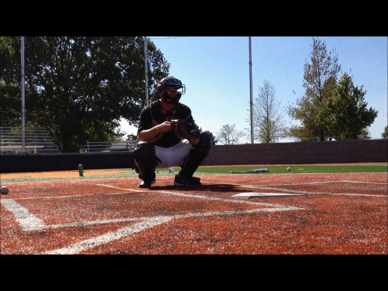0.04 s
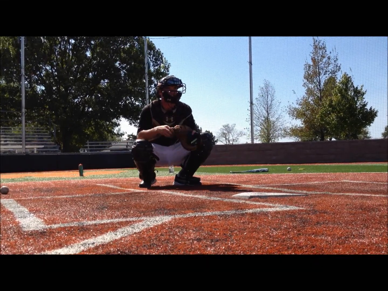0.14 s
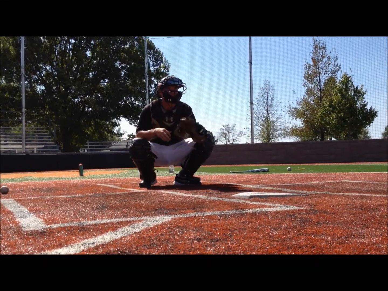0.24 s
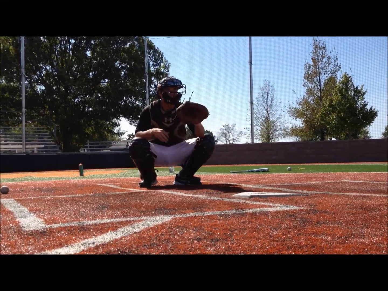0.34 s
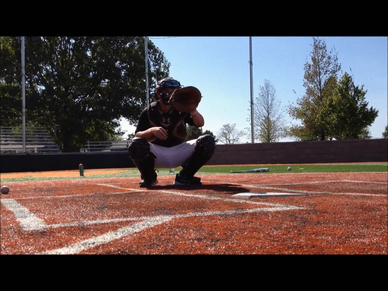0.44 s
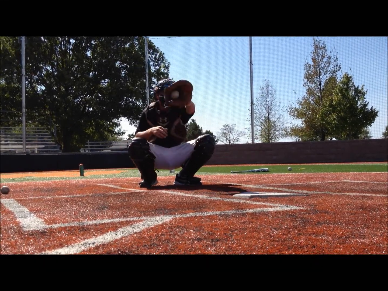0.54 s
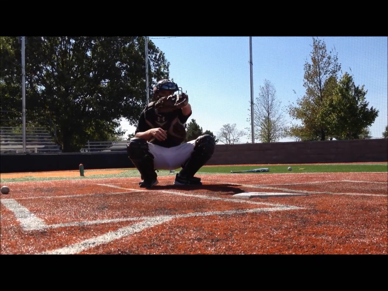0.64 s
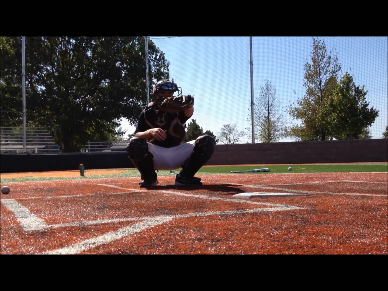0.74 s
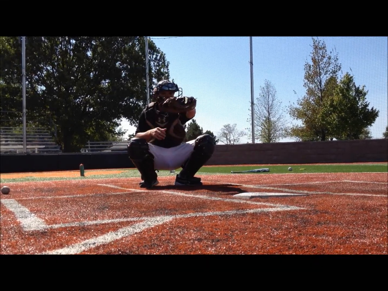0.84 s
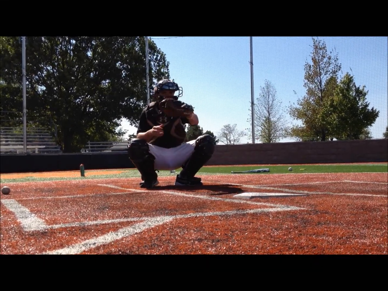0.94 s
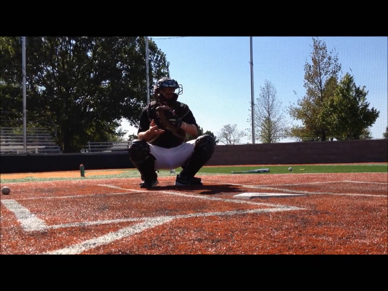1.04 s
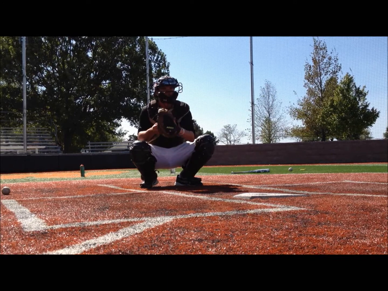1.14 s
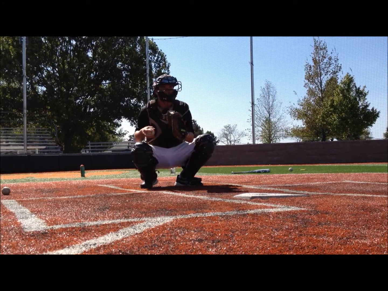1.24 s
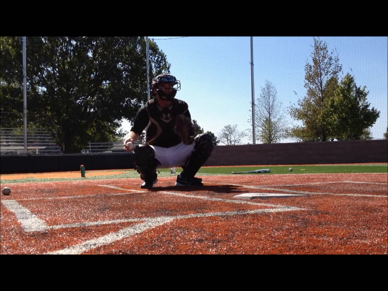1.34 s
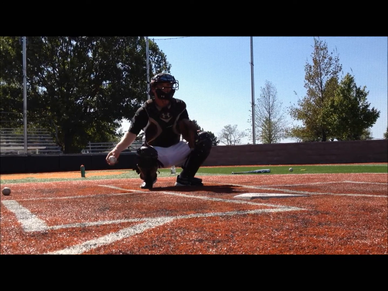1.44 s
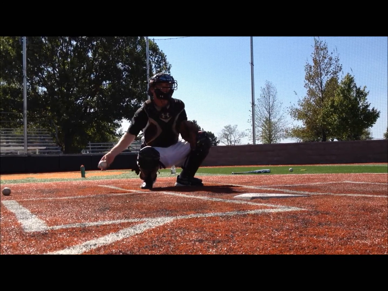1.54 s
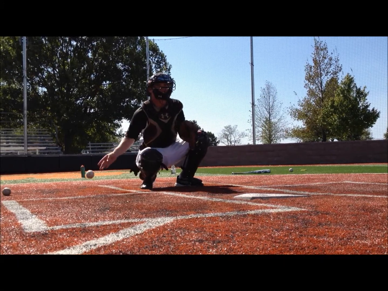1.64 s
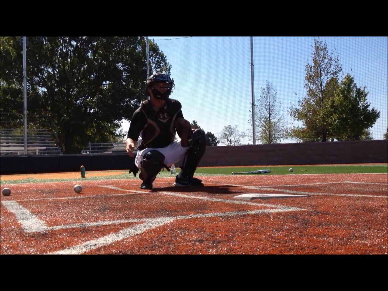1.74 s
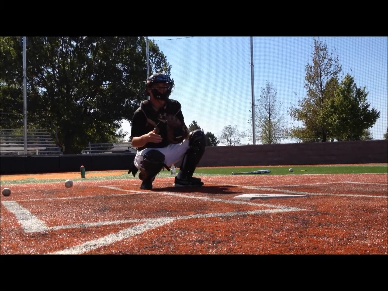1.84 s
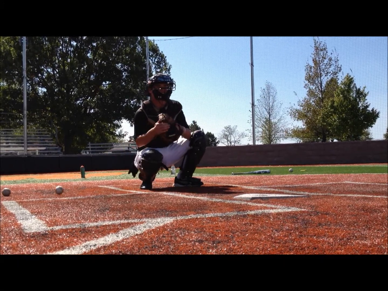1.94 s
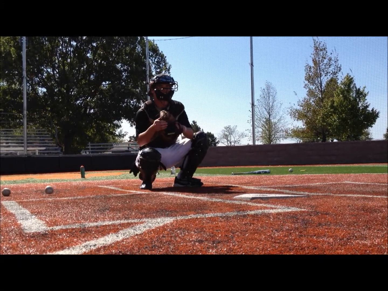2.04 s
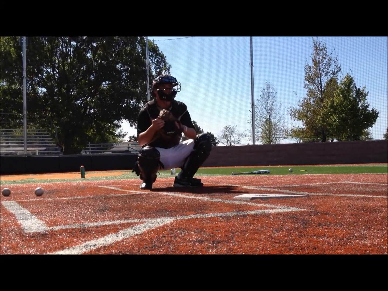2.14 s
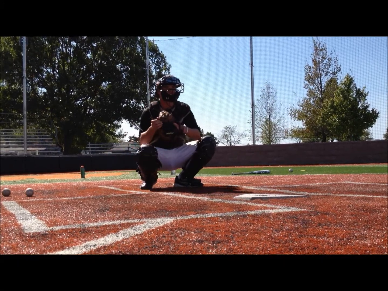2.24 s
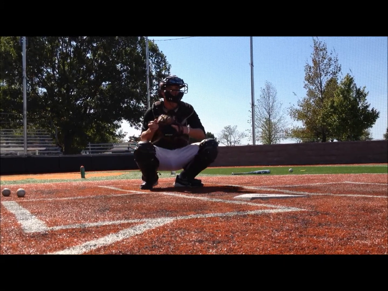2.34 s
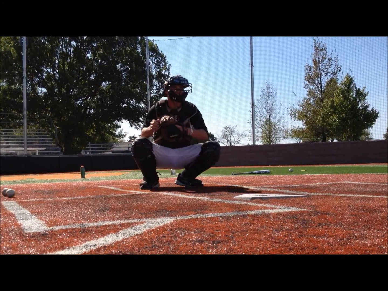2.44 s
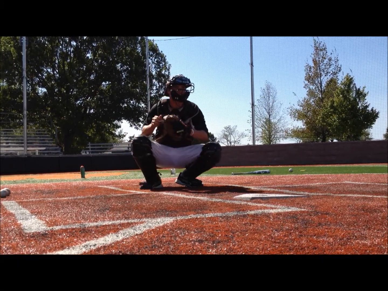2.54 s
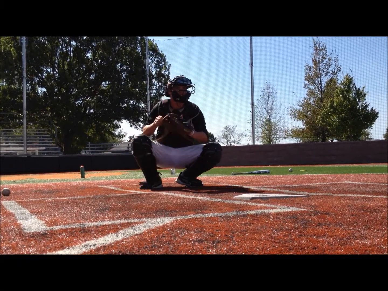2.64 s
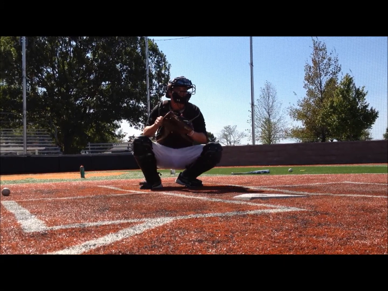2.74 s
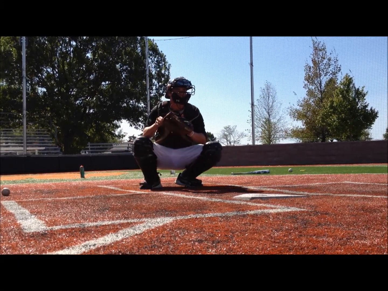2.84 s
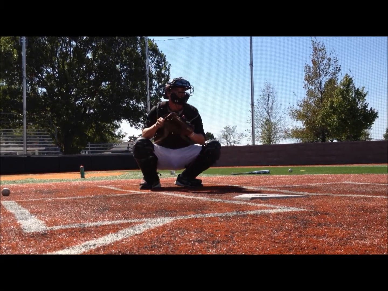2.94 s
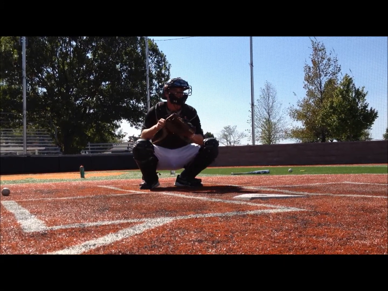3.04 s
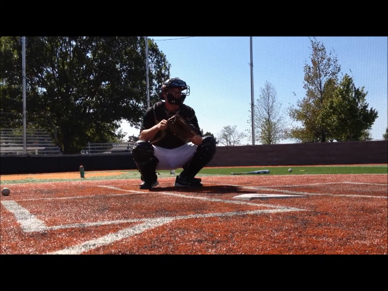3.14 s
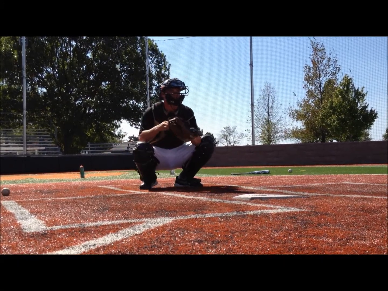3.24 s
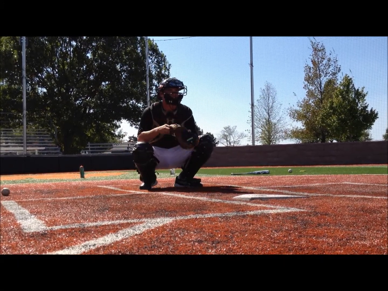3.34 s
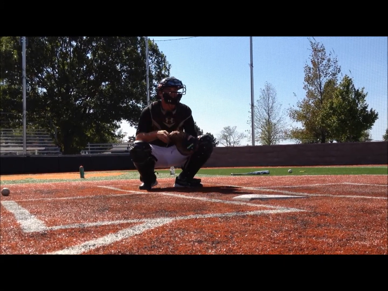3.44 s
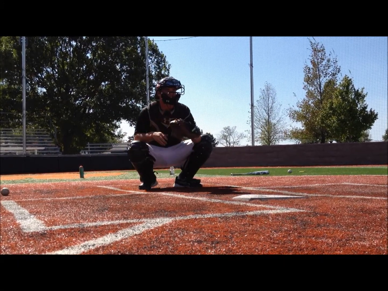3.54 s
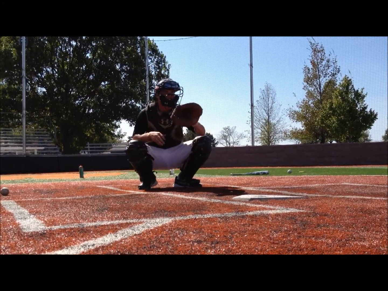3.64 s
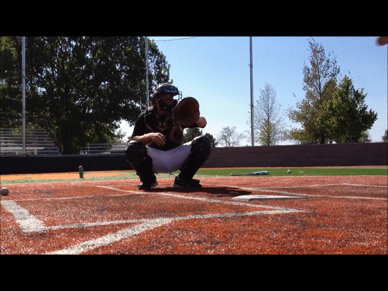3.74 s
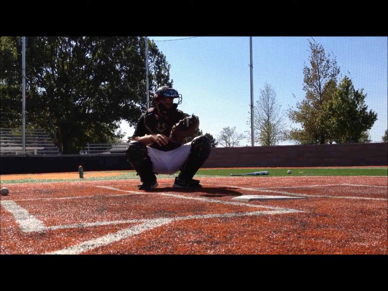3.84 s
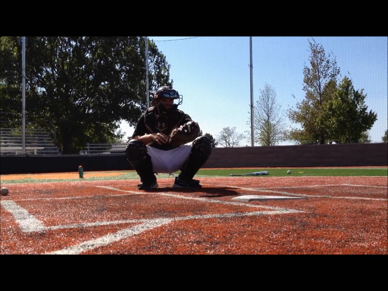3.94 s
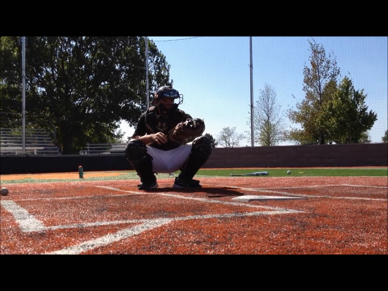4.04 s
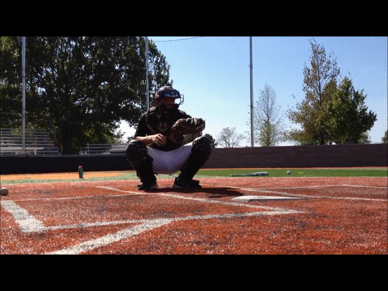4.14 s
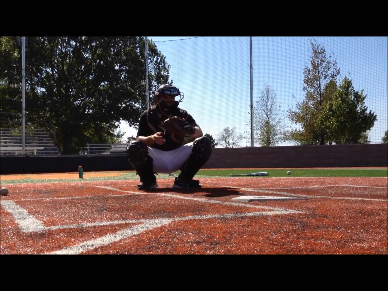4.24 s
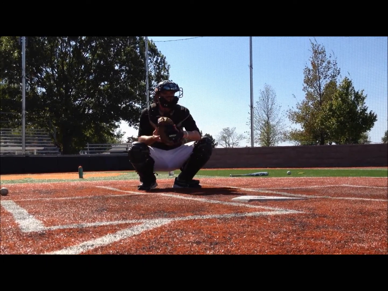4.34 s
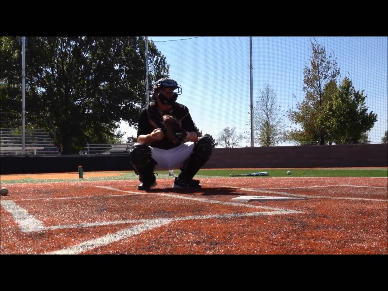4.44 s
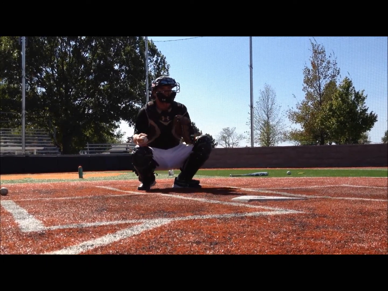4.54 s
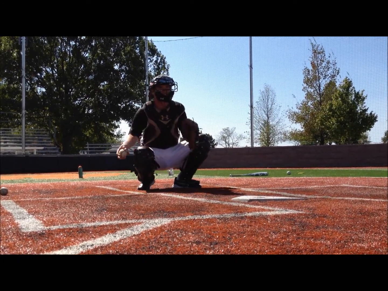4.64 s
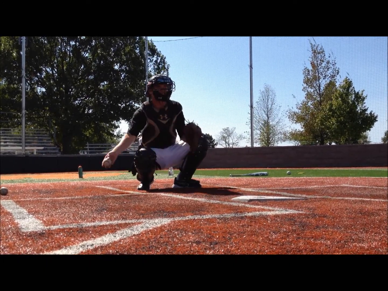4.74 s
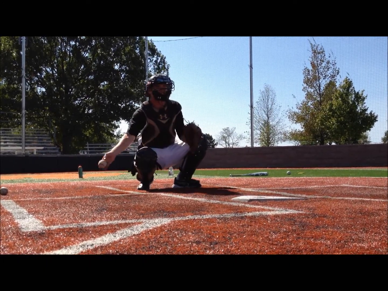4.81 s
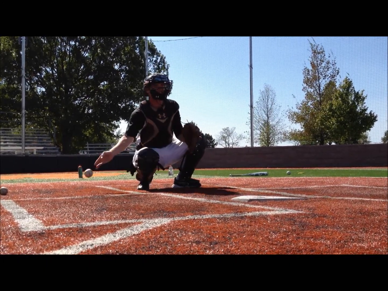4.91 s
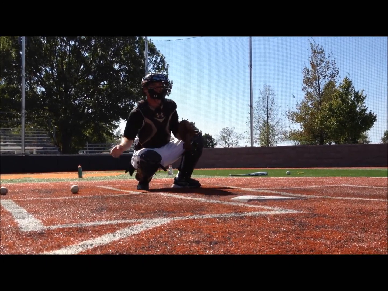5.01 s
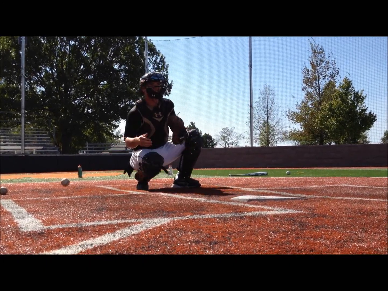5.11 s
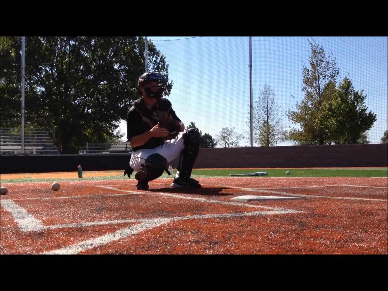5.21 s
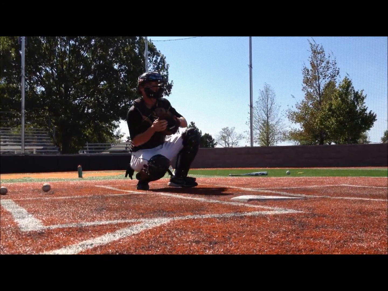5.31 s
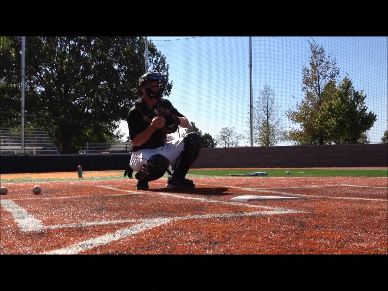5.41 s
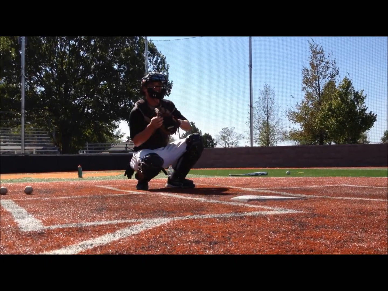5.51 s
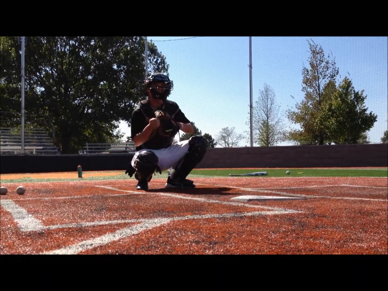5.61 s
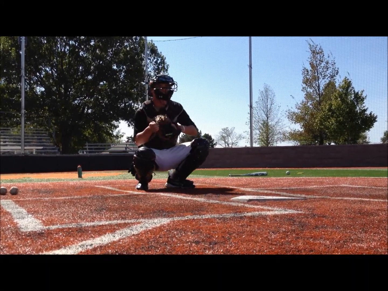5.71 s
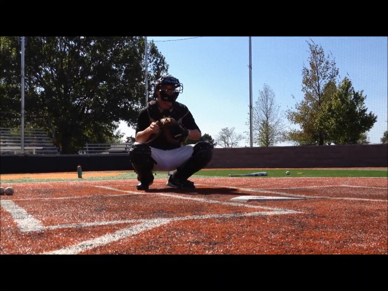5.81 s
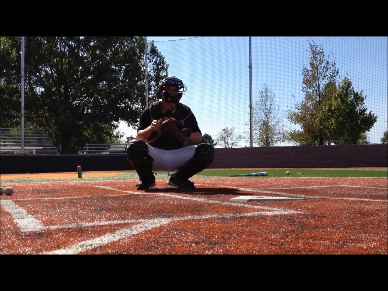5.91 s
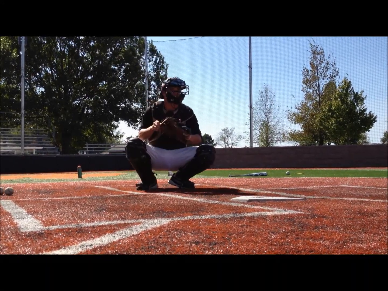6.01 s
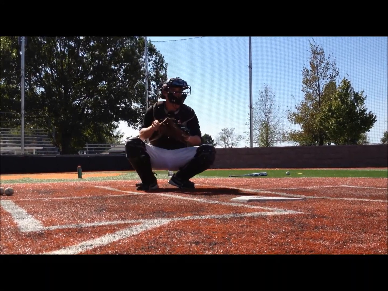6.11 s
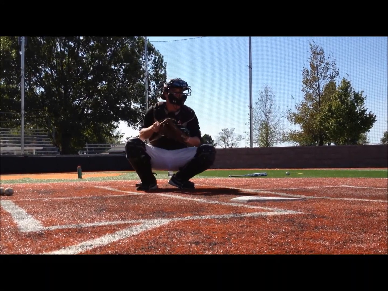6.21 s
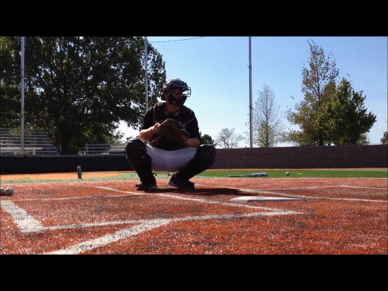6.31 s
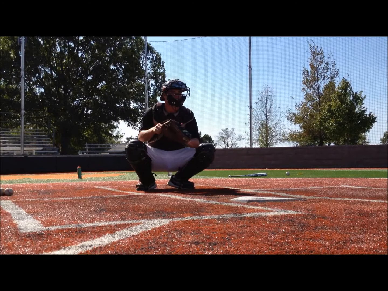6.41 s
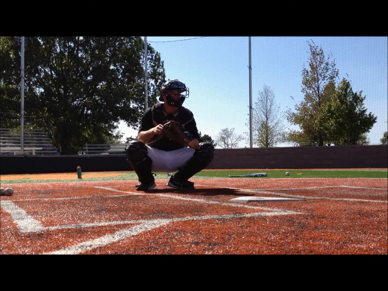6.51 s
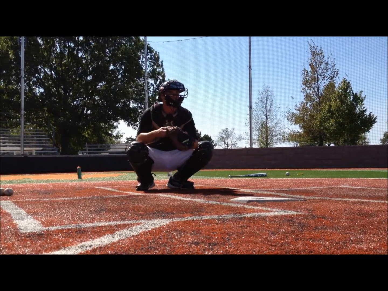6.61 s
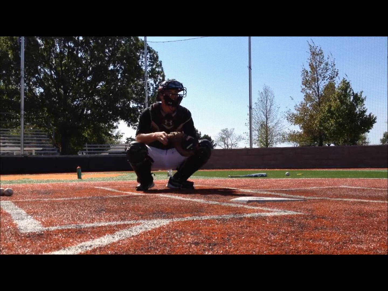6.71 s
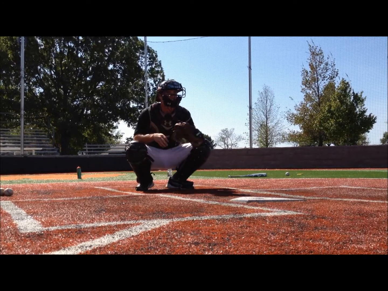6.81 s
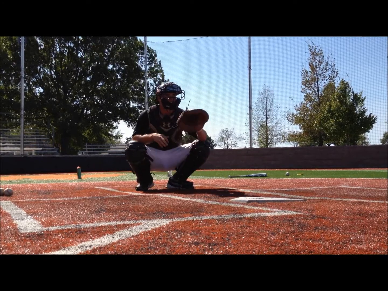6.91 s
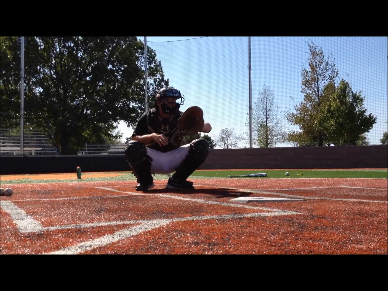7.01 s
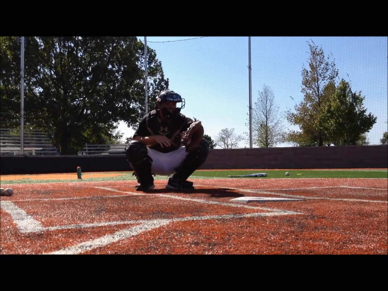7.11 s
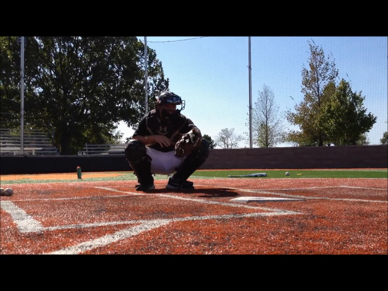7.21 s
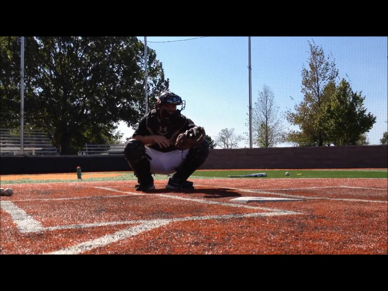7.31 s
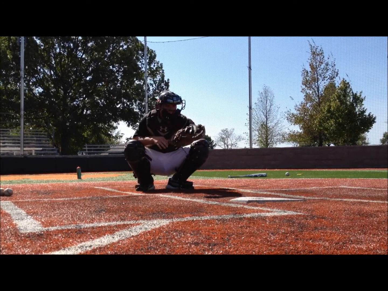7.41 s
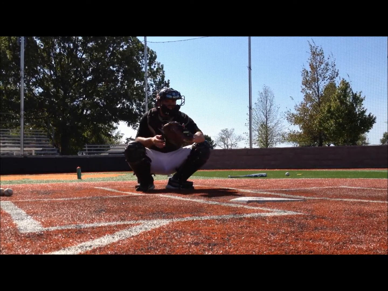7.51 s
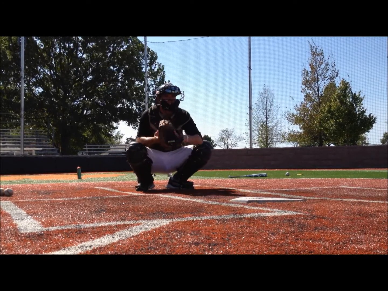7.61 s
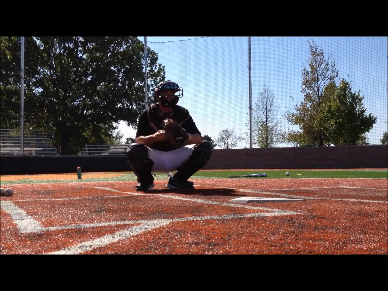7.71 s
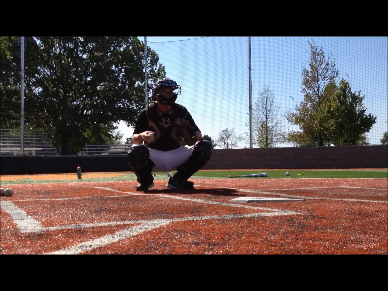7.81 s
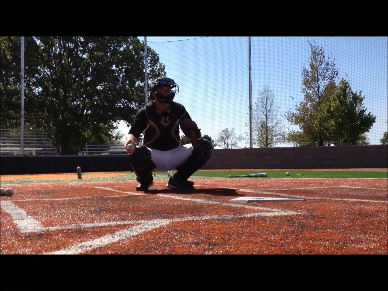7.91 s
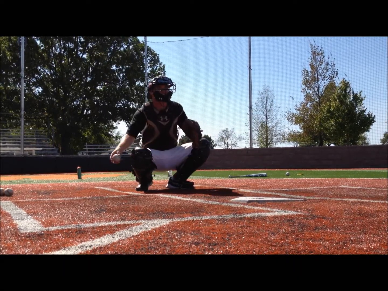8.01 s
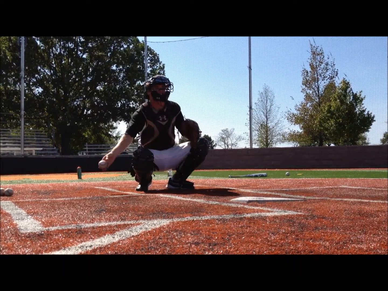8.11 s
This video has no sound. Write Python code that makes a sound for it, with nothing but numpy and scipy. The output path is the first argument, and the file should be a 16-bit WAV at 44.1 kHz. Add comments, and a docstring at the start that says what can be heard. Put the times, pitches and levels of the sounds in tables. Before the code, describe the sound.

A breezy open ballfield, heard centrally through one microphone: soft low rumble and flickering leaf hiss. At 0.1 s a pitching machine knocks dully, with a quick snap, loose rattle and faint steel ring. At 0.59 s a baseball hits a leather mitt: a very loud, bright, dry crack with a short hollow pop and padded thump, then weak echoes from wall and stands within a fraction of a second. The automatic level drops sharply and the background slowly swells back; far traffic rises around 2 s and fades. The machine knocks again at 3.3 s, and the second smack lands at 3.83 s. Background ducks and recovers, leaves growing hissier from about 4.6 s. Faint dull bumps of the crouching catcher come at 5.7 and 6.15 s, as distant tyres begin a faint low hum. The machine gives a double rattle at 6.6 s; the third, hardest smack lands at 7.14 s, and the background is pressed down again.

```python
"""A low rumble and hissing leaves come first, and almost at once a pitching machine knocks and rattles.
It fires three baseballs; half a second after each, the ball smacks into a catcher's mitt.
Launches are struck modes and shaken noise; catches are noise slaps and heavily damped resonances.
The outfield wall and the stands throw the smacks back across the field as delayed, band-limited copies.
A gain control clamps down on every catch and lets the background swell back slowly."""
import sys
import numpy as np
from scipy import signal
from scipy.fft import rfft, irfft
from scipy.io import wavfile
from scipy.ndimage import uniform_filter1d

SR = 44100
rng = np.random.default_rng(int(sys.argv[2]) if len(sys.argv) > 2 else 0)


def master_out(mix):
    """Clip the mix to full scale and print it as 16-bit PCM to the path in sys.argv[1]."""
    frames = np.transpose(np.atleast_2d(mix))
    ceiling = np.clip(frames, -1, 1)
    pcm = np.round(ceiling * 32767).astype(np.int16)
    wavfile.write(sys.argv[1], SR, pcm)


N = 359856  # length of the scene [samples]
EDGE_HZ = 15550  # cutoff of the final low-pass, and upper limit for band edges [Hz]


def amp(db):
    """Decibels to gain."""
    return 10 ** (np.asarray(db) / 20)


def unit(x):
    """Scales to an rms of one."""
    return x / np.sqrt(np.mean(x ** 2) + 1e-20)


def add(mix, start_s, sound):
    """Mixes a sound in at a time, cutting whatever runs past the end."""
    part = mix[round(start_s * SR):][:len(sound)]
    part += sound[:len(part)]


def band(x, low_hz, high_hz):
    """Band-pass filter."""
    edges = np.clip([low_hz, high_hz], 20, EDGE_HZ)
    return signal.sosfilt(signal.butter(2, edges, "bandpass", fs=SR, output="sos"), x)


def colour(x, spectrum):
    """Causal minimum-phase filter whose gain follows (frequency [Hz], level [dB]) points."""
    size = 4096
    hz, db = np.transpose(spectrum)
    bin_hz = abs(np.fft.fftfreq(size, 1 / SR))
    bin_db = np.interp(np.log(bin_hz + 1), np.log(hz), db)
    log_gain = np.log(amp(bin_db))
    # the Hilbert transform of the log gain gives the phase that puts the energy earliest
    response = np.exp(np.conj(signal.hilbert(log_gain)))
    taps = np.fft.ifft(response).real
    return signal.fftconvolve(x, taps[:size // 2])[:len(x)]


def noise(spectrum, count):
    """Coloured noise with an rms of one."""
    return unit(colour(rng.standard_normal(count), spectrum))


def drift(per_s):
    """Slow random wander with an rms of one, holding only rates up to the one given."""
    hz = np.fft.rfftfreq(N, 1 / SR)
    slow = (hz > 0) * (hz < per_s)
    return unit(irfft(rfft(rng.standard_normal(N)) * slow, N))


def swell(t, rise):
    """An envelope that peaks at one after the rise time and then dies away."""
    return t / rise * np.exp(1 - t / rise)


def blip(t, hz, cycles):
    """A heavily damped resonance whose envelope peaks after the given number of cycles."""
    return -swell(t, cycles / hz) * np.sin(2 * np.pi * hz * t)


def ring(t, modes):
    """Struck modes, each dying at its own speed."""
    return sum(amp(db - 60 * t / t60) * np.sin(2 * np.pi * hz * t) for hz, db, t60 in modes)


# The ball meets the mitt several times in each catch, from the rim to deep in the pocket:
# (time [s], slap level [dB], leather level [dB], leather pitch [Hz], pop level [dB], pop pitch [Hz])
MITT_CONTACTS = [(0.5876, -1.5, 0.5, 6660, -10, 294), (0.5881, -3, 5, 2043, -8, 900),
                 (0.5894, 6, 11, 2525, 2, 388), (3.8321, 6, 5.5, 4100, 3.5, 480),
                 (3.8328, -5, 0, 3260, 5, 295), (3.8354, 7, 8.7, 5700, 0.5, 750),
                 (7.1362, 7, 9, 3300, -6, 1260), (7.1377, 12, 15.2, 5050, 8, 359),
                 (7.1386, 2, 9.2, 3800, 9, 624)]
# Tone of the leather slap: (frequency [Hz], relative level [dB])
SLAP_SPECTRUM = [(300, -16), (900, -2), (1450, -7), (2000, 1), (3500, -3), (6800, 0), (9500, -6.5),
                 (13000, -7.5), (16000, -2.5)]
# The padded hand is driven back just after each catch: (time [s], level [dB], pitch [Hz])
HAND_RECOILS = [(0.5929, -6.5, 162), (3.84, -8.5, 207), (7.1420, -4, 160)]


def mitt():
    """Leather slaps and rings for an instant, trapped air pops out, and the padded hand recoils."""
    slap_rise_s, flutter_rise_s = 0.00049, 0.0024
    slaps, body = np.zeros(N), np.zeros(N)
    t = np.arange(SR // 20) / SR
    # laces and web flutter after the slap
    envelope = swell(t, slap_rise_s) + amp(-19) * swell(t, flutter_rise_s)
    envelope_rms = np.sqrt(np.mean(envelope ** 2))
    for s, slap_db, leather_db, leather_hz, pop_db, pop_hz in MITT_CONTACTS:
        crackle = envelope * rng.choice([-1., 1.], len(t))  # random signs turn the envelope into noise
        slap = unit(colour(crackle, SLAP_SPECTRUM)) * envelope_rms
        leather = amp(leather_db) * blip(t, leather_hz, cycles=1.94)
        air_pop = amp(pop_db) * blip(t, pop_hz, cycles=0.58)
        add(slaps, s, amp(slap_db) * slap)
        add(body, s, leather + air_pop)
    for s, db, hz in HAND_RECOILS:
        add(body, s, amp(db) * blip(t, hz, cycles=0.31))
    return slaps, body


# Jolts of the machine as its wheels grab a ball: (time [s], knock level [dB], rattle level [dB],
# rattle decay constant [s], steel ring level [dB], snap level [dB])
LAUNCH_JOLTS = [(0.0930, -27, -28.2, 0.035, -53, -18.5), (3.3321, -25, -28.6, 0.043, -43, -23.5),
                (6.6104, -24.4, -26, 0.032, -50, -34), (6.6440, -41.5, -28, 0.017, -48, -29)]
# Modes of the knocked frame: (frequency [Hz], relative level [dB], t60 [s])
FRAME_MODES = [(236.6, 2.5, 0.14), (404, -11.5, 0.17), (504, -4.5, 0.11), (533, -7, 0.2), (654, -15, 0.34),
               (970, -26, 0.39)]
# Modes of the ringing steel: (frequency [Hz], relative level [dB], t60 [s])
STEEL_MODES = [(3150, 0.5, 0.5), (3185, -6, 0.35), (3380, -1, 0.16), (8200, -6, 0.12), (8500, -2, 0.12),
               (11100, -3, 0.13)]
# Tone of the loose parts and the snap: (frequency [Hz], relative level [dB])
RATTLE_SPECTRUM = [(120, -19), (250, 7.5), (600, 5.5), (1100, -16), (2000, -6), (3300, -8.5), (4800, -13),
                   (6700, -3), (8600, -2), (9600, -18), (11300, -12), (15000, -31)]


def machine():
    """Each launch knocks the frame, shakes its loose parts and leaves the steel ringing."""
    out = np.zeros(N)
    t = np.arange(SR // 2) / SR
    knock = ring(t, FRAME_MODES) * (1 - np.exp(-t / 0.0014))  # rubber wheels soften the blow
    knock = band(knock, low_hz=170, high_hz=4000)
    for s, knock_db, rattle_db, rattle_s, steel_db, snap_db in LAUNCH_JOLTS:
        shake = amp(rattle_db) * (1 - np.exp(-t / 0.0025)) * np.exp(-t / rattle_s)
        snap = amp(snap_db) * swell(t, 0.00044)  # the wheels snatch the ball
        rattle = (shake + snap) * noise(RATTLE_SPECTRUM, len(t))
        steel = amp(steel_db) * ring(t, STEEL_MODES)
        add(out, s, amp(knock_db) * knock)
        add(out, s + 0.002, rattle + steel)  # 2 ms behind the knock
    return out


# Soft thuds as the catcher shifts in his crouch: (time [s], level [dB], pitch [Hz])
CROUCH_THUDS = [(5.682, -35, 290), (5.684, -25.5, 160), (5.712, -40.5, 140), (6.152, -33, 170)]


def catcher():
    """Body and pads bump dully, each a heavily damped resonance."""
    out = np.zeros(N)
    t = np.arange(SR // 10) / SR
    for s, db, hz in CROUCH_THUDS:
        add(out, s, amp(db) * blip(t, hz, cycles=0.48))
    return out


# Echoes from the ground, fence, wall and stands:
# (delay [s], level [dB], lower edge [Hz], upper edge [Hz])
SURFACE_ECHOES = [(0.0048, -16, 4520, 9000), (0.027, -51, 2500, 7000), (0.0671, -29.5, 235, 600),
                  (0.0754, -31.5, 3600, 5500), (0.0756, -29, 220, 480), (0.146, -36, 210, 430)]


def echoes(x):
    """Distinct reflections, each surface returning its own band."""
    out = np.zeros(N)
    for delay, db, low_hz, high_hz in SURFACE_ECHOES:
        add(out, delay, amp(db) * band(x, low_hz, high_hz))
    return out


def scatter(x, spectrum, t60, first_s):
    """A thin tail of many weak reflections, modelled as decaying noise of unit energy."""
    out = np.zeros(N)
    t = np.arange(SR) / SR
    tail = noise(spectrum, len(t)) * amp(-60 * t / t60)
    add(out, first_s, signal.fftconvolve(x, tail / np.linalg.norm(tail)))
    return out


# Scatter from the turf and backstop: (frequency [Hz], relative level [dB])
NEARBY_SPECTRUM = [(100, -3.5), (400, -0.5), (700, 2), (1500, -8), (3000, -6), (7000, -2.5), (13000, -1.5)]


def nearby_scatter(near):
    """Turf and backstop blur the mitt and the machine with a short early tail."""
    return amp(-37) * scatter(near, NEARBY_SPECTRUM, t60=0.197, first_s=0.005)


# Sound scattered back by the field: (frequency [Hz], relative level [dB])
FIELD_SPECTRUM = [(100, -2), (350, 12), (700, -6), (1300, -7), (3000, 4), (6000, 5), (12000, -2)]


def field_scatter(slaps, body):
    """The field returns a longer, later tail of each catch."""
    sent = amp(-30) * slaps + amp(-43) * body  # the slap spreads widest
    return scatter(sent, FIELD_SPECTRUM, t60=0.53, first_s=0.076)


# Tone of the distant rumble: (frequency [Hz], relative level [dB])
RUMBLE_SPECTRUM = [(25, -35), (60, -25.5), (110, -9), (155, -4), (188, 2), (230, -3.5), (350, -11),
                   (600, -28.5), (1500, -46)]
# The rumble surges, then lulls: (time [s], half-width [s], level change [dB])
RUMBLE_SURGES = [(2.75, .7, 3), (5.0, 0.81, -3)]


def rumble(t):
    """Low noise, lumpy from slow drift, with one surge and one lull."""
    surge_db = sum(db * np.exp(-((t - s) / width) ** 2) for s, width, db in RUMBLE_SURGES)
    level_db = -47 + surge_db + 0.87 * drift(per_s=12)
    return amp(level_db) * noise(RUMBLE_SPECTRUM, N)


# Tone of the far traffic: (frequency [Hz], relative level [dB])
TRAFFIC_SPECTRUM = [(120, -27.5), (300, 0), (450, -1), (750, -5.5), (1050, -16), (2000, -31), (5000, -26.5)]


def traffic(t):
    """Far traffic noise swells once and fades."""
    start_s, peak_s, fade_s, peak_gain_db = 1.37, 2.12, 1.26, 5
    approach = np.clip((t - start_s) / (peak_s - start_s), 0, 1)
    passing = approach * np.exp(-(np.maximum(t - peak_s, 0) / fade_s) ** 2)
    level_db = -55 + peak_gain_db * passing + 0.46 * drift(per_s=8)
    return amp(level_db) * noise(TRAFFIC_SPECTRUM, N)


# Tone of the singing tyres: (frequency [Hz], relative level [dB])
TYRE_SPECTRUM = [(300, -38), (400, -11), (465, 0), (520, -10), (640, -35), (2000, -70)]


def tyres(t):
    """Far tyres start to sing: a narrow band of noise fades in and stays."""
    start_s, rise_s, level_db = 5.9, 1.25, -56
    fade_in = np.clip((t - start_s) / rise_s, 0, 1)
    return amp(level_db) * fade_in * noise(TYRE_SPECTRUM, N)


# Tone of the hissing trees: (frequency [Hz], relative level [dB])
LEAF_SPECTRUM = [(300, -18), (1100, -13), (1800, -7.5), (2700, -8.5), (4000, -5), (5200, -2), (6600, 0.5),
                 (8200, -2.5), (9800, -9.5), (12500, -11), (15300, -21.5)]


def leaves(t):
    """Leaves hiss as flickering high noise, louder once the breeze freshens."""
    start_s, rise_s, gain_db = 4.56, 2.42, 3.1
    breeze = np.clip((t - start_s) / rise_s, 0, 1)
    level_db = -43 + gain_db * breeze + 0.47 * drift(per_s=15)
    return amp(level_db) * noise(LEAF_SPECTRUM, N)


def scene():
    """Everything reaches one microphone, heard in both channels."""
    t = np.arange(N) / SR
    slaps, body = mitt()
    near = slaps + body + machine()
    reflected = echoes(near) + nearby_scatter(near) + field_scatter(slaps, body)
    background = rumble(t) + traffic(t) + tyres(t) + leaves(t)
    mono = near + catcher() + reflected + background
    return np.array([mono, mono])


def record(dry, ceiling_db=-7.5, recovery_s=1.52, bass_cut_hz=75):
    """Bass cut; gain control drops at once on a loud peak and creeps back; tips clip; treble is cut."""
    dry = signal.sosfilt(signal.butter(2, bass_cut_hz, "highpass", fs=SR, output="sos"), dry)
    level = np.sqrt(abs(uniform_filter1d(dry[0] ** 2, size=48)) + 1e-12)  # rms over about 1 ms
    needed = np.maximum(1 - amp(ceiling_db) / level, 0)
    # each cut holds as a running maximum that decays over the recovery time
    fade = np.exp(-np.arange(N) / SR / recovery_s)
    cut = fade * np.maximum.accumulate(needed / fade)
    clipped = np.clip(dry * (1 - cut), -0.92, 0.92)
    lowpass = signal.firwin(401, EDGE_HZ, window=("kaiser", 9), fs=SR)
    return signal.oaconvolve(clipped, lowpass[None], "same")


dry = scene()
out = record(dry)
master_out(out)
```